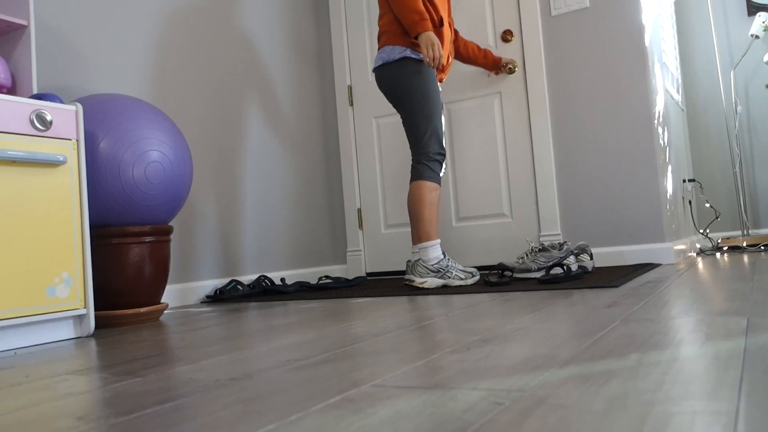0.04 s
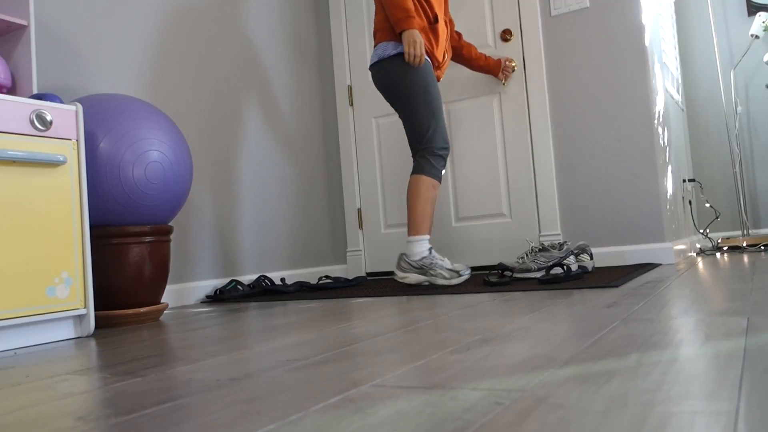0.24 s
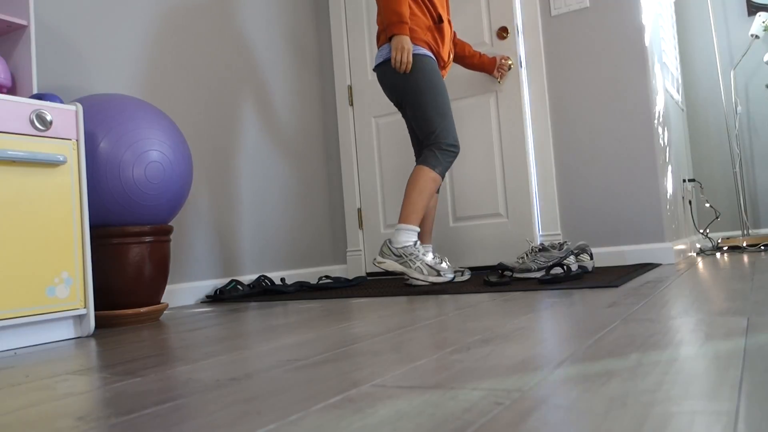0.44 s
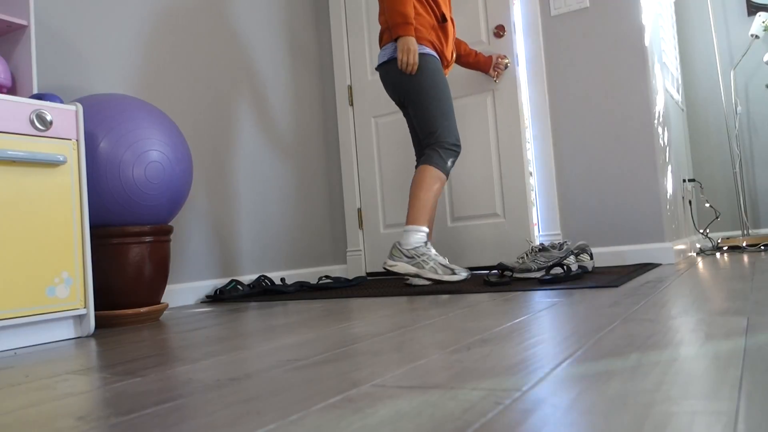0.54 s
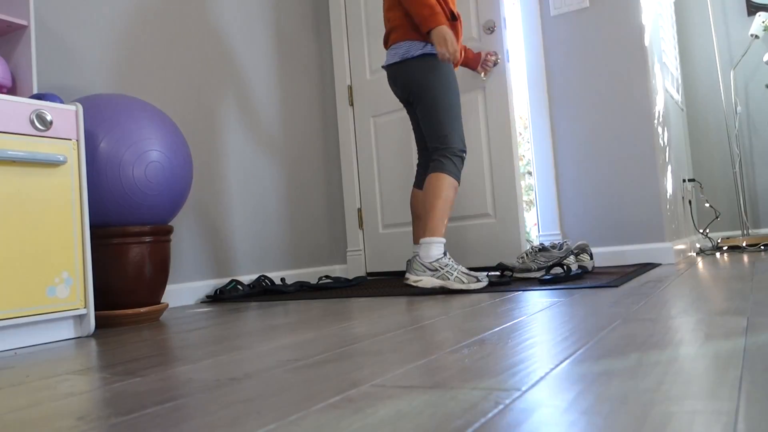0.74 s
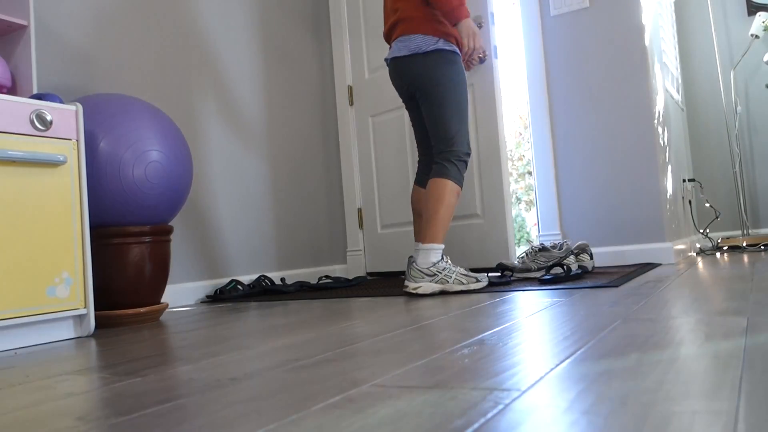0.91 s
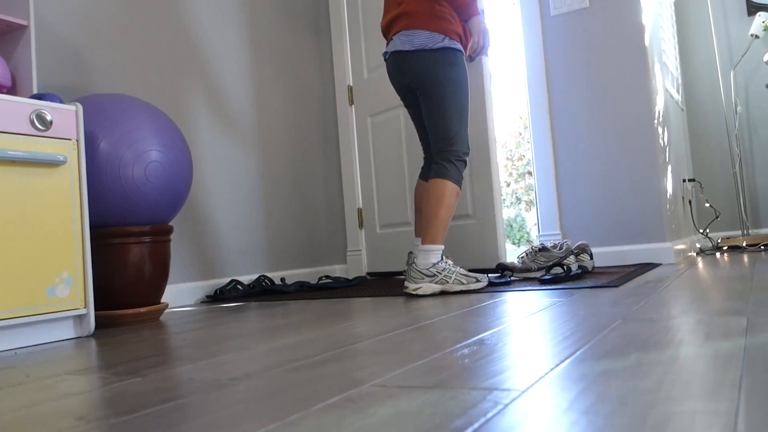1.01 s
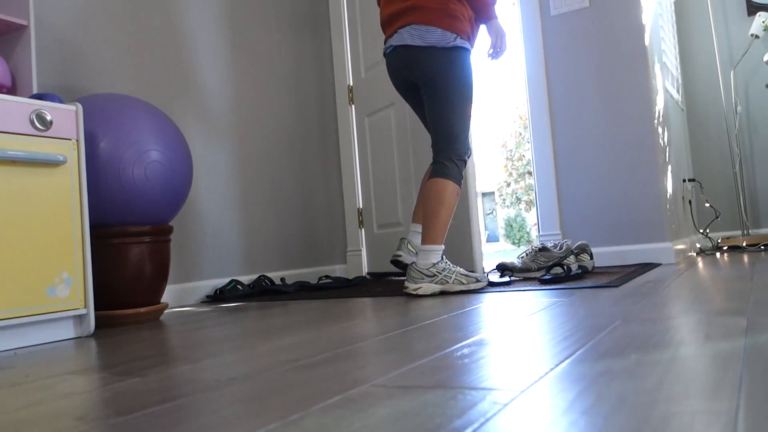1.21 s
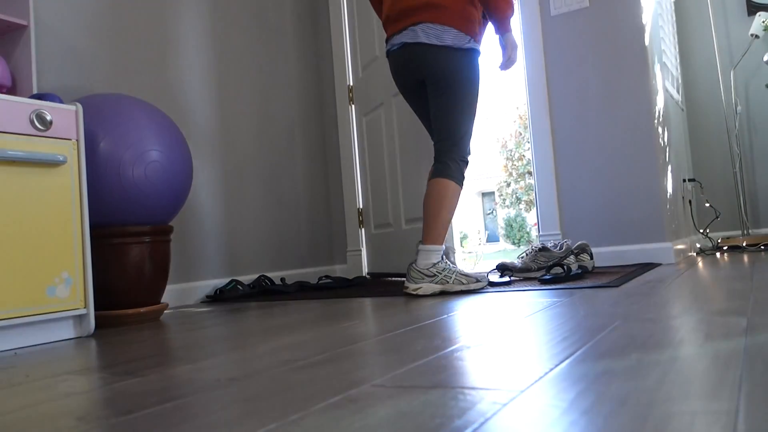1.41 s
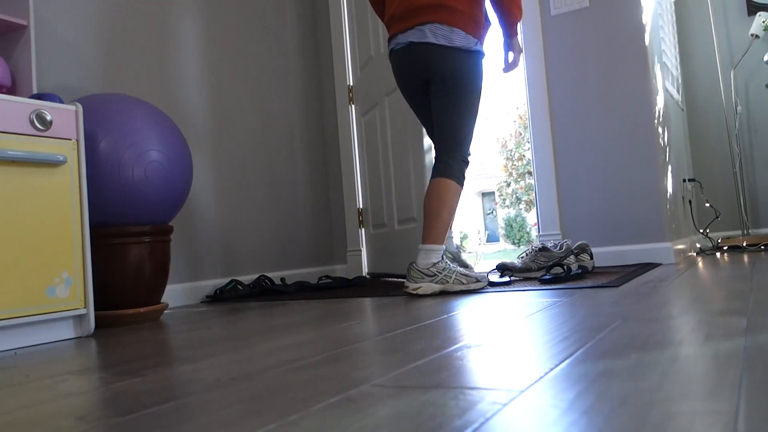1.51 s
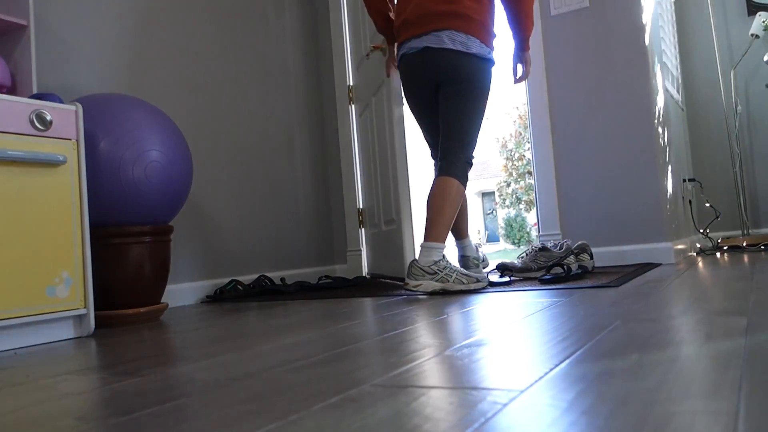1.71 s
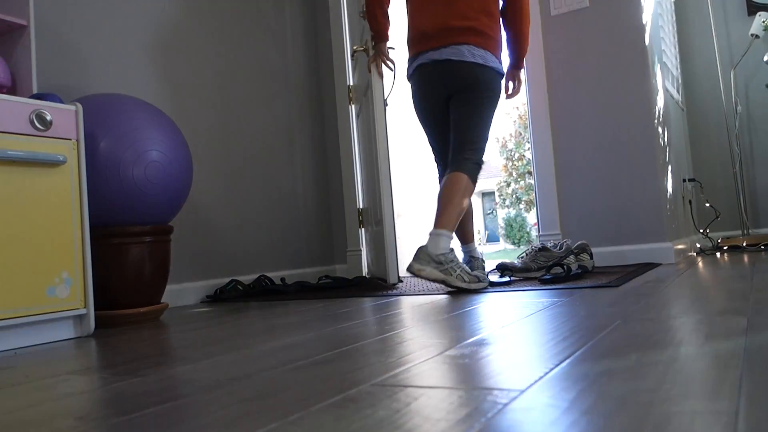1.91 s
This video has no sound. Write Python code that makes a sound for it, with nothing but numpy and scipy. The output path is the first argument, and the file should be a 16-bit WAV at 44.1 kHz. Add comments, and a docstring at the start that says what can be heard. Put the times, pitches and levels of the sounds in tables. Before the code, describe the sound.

A door hinge creaks and squeals as the door opens after a latch click.

```python
"""A front door opens in a hard-floored hall. Clothes rustle, the door knocks, the knob grinds and ticks.
The latch bolt slides on the strike plate and snaps free at 0.3 s. A dry hinge creaks: its stick-slip
speeds up from a rasp to a squeal as the door swings, over the faint groan of a second hinge.
At 1.15 s the bottom seal brushes the sill, catches and flicks free. The squeal ends at 1.5 s;
shoes shuffle and squeak faintly."""
import sys
import numpy as np
from scipy import signal
from scipy.fft import rfft, irfft
from scipy.io import wavfile

SR = 44100
rng = np.random.default_rng(int(sys.argv[2]) if len(sys.argv) > 2 else 0)


def dump(signal):
    """Clip the signal to [-1, 1] and save it as 16-bit WAV at the path in sys.argv[1]."""
    limited = np.clip(np.atleast_2d(signal).T, -1, 1)
    pcm = np.round(limited * 32767).astype(np.int16)
    wavfile.write(sys.argv[1], SR, pcm)


N = 85995
T = np.arange(N) / SR
BINS_HZ = np.fft.rfftfreq(N, 1 / SR)
TOP_HZ, PIVOT_HZ = 15800, 1468  # band limit; reference for rasp tilt and bending delay
# hinge and door leaf response: freq_hz, gain_db
DOOR_COLOUR = [(100, -44), (450, -13.5), (900, -12.5), (1300, -1.5), (2400, 2.5), (3800, 1), (4600, 2.5),
               (5250, 4), (5750, -2.5), (6250, -3), (6800, -1.5), (7400, -7), (8200, -7.5), (9100, -14.5),
               (9800, -8.5), (11000, -13), (16000, -24)]


def undb(db):
    """Decibels to gain."""
    return 10 ** (np.asarray(db) / 20)


def unit(x):
    """Scale to rms 1."""
    return x / np.sqrt(np.mean(x ** 2) + 1e-20)


def at_hz(points, hz):
    """Read (freq_hz, value) points on a log-frequency axis."""
    freqs, values = np.array(points, float).T
    return np.interp(np.log(np.maximum(hz, 1)), np.log(freqs), values)


def curve(rows, column=1):
    """One column of a timed table at every sample."""
    rows = np.array(rows, float)
    return np.interp(T, rows[:, 0], rows[:, column])


def swell(rows, column=1):
    """Gain from a dB column, silent outside the table."""
    return undb(curve(rows, column)) * (T >= rows[0][0]) * (T <= rows[-1][0])


def walk(rate_hz):
    """Smooth random motion, spread near 1."""
    return np.interp(T * rate_hz, np.arange(N // 8), rng.standard_normal(N // 8))


def body(x, colour, size=2048):
    """Ring a minimum-phase, unit-energy filter of the given spectrum."""
    gain = undb(at_hz(colour, np.fft.rfftfreq(size, 1 / SR)))
    cepstrum = irfft(np.log(gain))
    cepstrum[1:size // 2] *= 2
    cepstrum[size // 2 + 1:] = 0
    ring = irfft(np.exp(rfft(cepstrum)))
    return signal.fftconvolve(x, ring / np.linalg.norm(ring))[:N]


def diffuse_spectra(size, coherent_hz=1800):
    """Diffuse noise at two close points: alike in the bass, unrelated in the treble."""
    hz = np.fft.rfftfreq(size, 1 / SR)
    coherence = 1 / (1 + (hz / coherent_hz) ** 2)
    mid, side = rfft(rng.standard_normal((2, size)))
    pair = mid * np.sqrt(1 + coherence) + np.array([[1], [-1]]) * side * np.sqrt(1 - coherence)
    return hz, pair / np.sqrt(2)


def hall(x, wet_db, gap_s=0.00319, size=24000):
    """Direct sound plus a dense stereo tail whose treble dies first."""
    # reverberation: freq_hz, t60_s
    decays = [(150, 0.49), (1000, 0.55), (4000, 0.49), (14000, 0.38)]
    hz, noise = diffuse_spectra(size)
    age_s, tail = T[:size] - gap_s, 0
    for band_hz, t60_s in decays:
        share = at_hz([(f, f == band_hz) for f, _ in decays], hz)
        fade = np.exp(-np.log(1000) * age_s / t60_s) * (age_s > 0)
        tail = tail + irfft(noise * share) * fade / np.linalg.norm(fade)
    wet = signal.fftconvolve(x[None], tail, axes=1)[:, :N]
    return (x + undb(wet_db) * wet) / np.hypot(1, undb(wet_db))


def rub(levels, colour, uneven_db=0, grains_per_s=8300, grain_spread_db=1):
    """Friction: dense tiny catches of random size; uneven_db adds fits and starts."""
    grains = (rng.random(N) < grains_per_s / SR) * rng.standard_normal(N)
    grains *= undb(grain_spread_db * rng.standard_normal(N))
    grains *= undb(uneven_db * walk(120))
    return body(unit(grains) * swell(levels), colour)


def hits(rows, colour):
    """Contacts: decaying noise bursts ring a body."""
    force = sum(undb(level_db) * (T >= start_s) * np.exp(-np.maximum(T - start_s, 0) / decay_s)
                for start_s, level_db, decay_s in rows)
    return body(force * rng.standard_normal(N), colour)


def room_tone(level_db=-63.5):
    """The quiet house and a smooth hiss."""
    # background spectrum: freq_hz, gain_db
    colour = [(30, -35), (110, -13.5), (250, -15), (460, -18), (650, 5.5), (800, -28), (1300, -1),
              (1850, 4), (2600, -4), (4500, -6.5), (15500, -8.5)]
    _, noise = diffuse_spectra(N)
    return unit(np.array([body(side, colour) for side in irfft(noise, N)])) * undb(level_db)


def rustle():
    """Clothes and shoes rub in fits and starts."""
    # friction: time_s, level_db
    levels = [(0, -44.5), (.04, -56.5), (.12, -59.5), (.6, -61), (1.5, -70), (1.72, -72), (1.757, -69),
              (1.8, -73), (1.87, -63.5), (1.95, -80)]
    # rustle spectrum: freq_hz, gain_db
    colour = [(60, -28), (170, -15.5), (270, -3), (420, -10.5), (650, -6), (1000, 0), (2100, -6.5),
              (3500, -9.5), (7000, -20), (16000, -26.5)]
    return rub(levels, colour, uneven_db=5.5)


def knocks():
    """Door and shoes knock on wood."""
    # contacts: start_s, level_db, decay_s
    blows = [(.147, -35.5, 0.0048), (.218, -36, 0.0084), (.319, -36.5, 0.0051), (.758, -30, 0.0056),
             (.971, -37, 0.0048), (1.215, -42, 0.017)]
    # wood response: freq_hz, gain_db
    wood = [(50, -19), (120, -32), (250, -2), (500, -1.5), (1000, 4.5), (2200, -2.5), (4000, -27),
            (7000, -32), (16000, -27)]
    return hits(blows, wood)


def spindle():
    """The knob spindle grinds as it turns."""
    # friction: time_s, level_db
    levels = [(.147, -50), (.19, -36.5), (.23, -40), (.3, -43), (.36, -47.5), (.46, -47.5)]
    # spindle response: freq_hz, gain_db
    colour = [(50, -55.5), (150, -13.5), (400, -22), (700, -4), (950, 2.5), (1800, -6), (3000, -12),
              (4500, -16.5), (7000, -20), (16000, -31)]
    return rub(levels, colour, uneven_db=2.5)


def knob_ticks():
    """The knob and its spring tick crisply."""
    # contacts: start_s, level_db, decay_s
    ticks = [(.1725, -36, 0.00054), (.1792, -28, 0.001), (.1875, -35, 0.0012), (.195, -45, .0015),
             (.2015, -37, 0.0029), (.213, -36.5, 0.0091)]
    # knob response: freq_hz, gain_db
    colour = [(200, -31), (1000, 2), (4000, 14), (6000, -16), (8500, 5.5), (12000, -2.5), (16000, 2)]
    return hits(ticks, colour)


def bolt_slide():
    """The bolt slides on the strike plate."""
    # friction: time_s, level_db
    levels = [(.2, -50), (.245, -37), (.3, -35), (.332, -32.5), (.355, -33.5)]
    # bolt response: freq_hz, gain_db
    colour = [(500, -40), (2500, -11.5), (3400, -7), (3800, -3.5), (4250, 0.5), (4650, -6.5), (5100, -14),
              (6500, -25.5), (16000, -65)]
    return rub(levels, colour)


def bolt_snaps():
    """The bolt jumps off the plate in quick blows and rings briefly."""
    # blows: start_s, peak_db
    snaps = [(.2885, -39), (.2965, -26), (.3398, -19), (.3485, -18.5), (.3512, -19), (.3548, -31)]
    # bolt modes: freq_hz, gain_db, t60_s
    modes = [(3450, -3, 0.014), (3910, -2.5, 0.018), (4010, -1.5, 0.021), (4340, 1.5, 0.0073),
             (4590, -22, .012)]
    start_s, peak_db = np.array(snaps).T
    age_s = np.maximum(T - start_s[:, None], 0)
    ring = 0
    for k, (hz, gain_db, t60_s) in enumerate(modes):
        fade = np.exp(-np.log(1000) * age_s / t60_s)
        ring = ring + (-1) ** k * undb(gain_db) * np.sin(2 * np.pi * hz * age_s) * fade
    return undb(peak_db) @ ring / abs(ring).max()


def hinge(wander=0.005, pivot_delay_s=0.003, pin_db=-6):
    """One unsteady stick-slip rate drives the door's rasp, the pin's ring and the squeal."""
    # slip rate, following door speed: time_s, rate_hz
    rates = [(.355, 247), (.392, 283), (.42, 339.1), (.45, 368.9), (.5, 424), (.55, 478), (.6, 554.5),
             (.62, 642.4), (.642, 775), (.672, 895), (.7, 1011), (.73, 1135), (.77, 1201), (.81, 1219),
             (.86, 1199), (.89, 1136), (.92, 1034), (.955, 905.3), (1.008, 851.3), (1.052, 883.7),
             (1.084, 962.5), (1.148, 1017), (1.178, 1241), (1.226, 1268), (1.31, 1248), (1.41, 1243),
             (1.5, 1224)]
    # uneven slipping as the door speeds up and slows: time_s, spread_ratio
    jitter = [(.36, .008), (.5, .012), (.62, .018), (.7, .012), (.78, .005), (.85, .005), (.92, .022),
              (1.01, .008), (1.08, .022), (1.2, .005)]
    # hinge pin response: freq_hz, gain_db
    pin_colour = [(3000, -55), (5900, -43), (6450, -14.5), (6780, -3.5), (7100, -9), (7600, -24.5),
                  (11000, -51)]
    slip_hz = curve(rates) * (1 + curve(jitter) * walk(250) + wander * walk(70))
    cycles = np.cumsum(slip_hz) / SR
    slips, grit = rasp(slip_hz, cycles)
    # bending waves in the door: lows arrive later
    bending = np.exp(-4j * np.pi * pivot_delay_s * np.sqrt(PIVOT_HZ * BINS_HZ))
    door = body(irfft(rfft(slips + grit) * bending, N), DOOR_COLOUR)
    pin = undb(pin_db) * body(slips, pin_colour)
    return hall(door, wet_db=1.5) + hall(pin, wet_db=-9) + squeal(cycles)


def rasp(slip_hz, cycles, puff_decay_cycles=0.29):
    """One sharp slip and a puff of grit per cycle, softening as the hinge runs freely."""
    # slips from partial 4 up: time_s, level_db, tilt_db_per_octave, grit_db
    shape = [(.354, -36.5, 1.5, -5.5), (.378, -33.5, -0.5, 3), (.42, -32.5, 1, -0.5), (.5, -31.5, -0.5, -8),
             (.6, -36, -1.5, -1.5), (.68, -42.5, -3.5, -1), (.75, -45.5, -4.5, -2), (.82, -48.5, 2.5, -4),
             (.88, -51, -1, 0), (.93, -52, -8.5, -3), (.975, -49.5, -12.5, -0.5), (1.03, -56.5, -18, -21),
             (1.13, -66, -13, -1), (1.17, -72, -6, -9)]
    tilt_db = curve(shape, column=2)
    slips, power = np.zeros(N), np.full(N, 1e-12)
    sounding = (T >= shape[0][0]) & (T <= shape[-1][0])
    for k in range(4, int(TOP_HZ / slip_hz.min())):
        on = sounding & (k * slip_hz < TOP_HZ)
        partial_hz = k * slip_hz[on]
        gain = undb(tilt_db[on] * np.log2(np.maximum(partial_hz / PIVOT_HZ, 1)))
        slips[on] += gain * np.cos(2 * np.pi * k * cycles[on])
        power[on] += (gain * undb(at_hz(DOOR_COLOUR, partial_hz))) ** 2 / 2
    puffs = rfft(rng.standard_normal(N) * unit(np.exp(-(cycles % 1) / puff_decay_cycles)))
    octaves = np.log2(np.maximum(BINS_HZ / PIVOT_HZ, 1))
    grit = sum(irfft(puffs * np.maximum(1 - abs(octaves - k), 0), N) * undb(tilt_db * k)
               for k in range(5))
    grit *= np.sqrt(SR / slip_hz) / 2 * undb(curve(shape, column=3))
    # slips reach level_db after the door's filter
    door_power = np.mean(undb(at_hz(DOOR_COLOUR, BINS_HZ)) ** 2)
    force = np.sqrt(door_power / power) * swell(shape)
    return force * slips, force * grit


def squeal(cycles, flutter_db=4):
    """The three lowest slip partials sing, each fluttering on its own."""
    # partial levels: time_s, first_db, second_db, third_db
    levels = [(.36, -71, -64, -64), (.44, -57.5, -51.5, -52), (.52, -61, -43.5, -45),
              (.6, -49.5, -44.5, -42.5), (.645, -48, -44.5, -39.5), (.672, -35, -36.5, -45),
              (.695, -44.5, -42, -46), (.735, -38.5, -39.5, -46), (.77, -48.5, -35, -40),
              (.81, -39.5, -48.5, -42), (.86, -51.5, -38, -42.5), (.888, -31.5, -34, -47.5),
              (.925, -41, -41, -43), (.965, -33, -33.5, -42), (1.008, -41, -40, -54),
              (1.04, -36.5, -60, -42), (1.07, -40.5, -34.5, -47), (1.1, -43.5, -50, -59.5),
              (1.14, -40, -58, -60), (1.172, -68, -56, -70), (1.23, -49, -42, -46.5),
              (1.275, -47.5, -63, -67), (1.305, -55, -41.5, -68), (1.385, -53, -67, -76),
              (1.41, -72, -57, -77), (1.44, -72, -62, -80), (1.475, -52, -66, -91), (1.5, -53.5, -71, -74),
              (1.508, -81, -76, -88)]
    # reverberation per partial: wet_db
    sends = [-4, 1, 1]
    out = 0
    for k, wet_db in enumerate(sends, 1):
        gain = np.sqrt(2) * swell(levels, column=k) * undb(flutter_db * walk(130))
        partial = gain * np.sin(2 * np.pi * k * cycles)
        out = out + hall(partial + hall_ring(partial), wet_db)
    return out


def hall_ring(drive):
    """The hall rings on where the squeal sweeps past its resonances."""
    # hall resonances: freq_hz, gain_db, t60_s
    resonances = [(1193, -8, 0.49), (2390, -5, 0.52), (2430, 4, .35), (3360, -2, 0.37), (3540, -4, .35)]
    ring = 0
    for hz, gain_db, t60_s in resonances:
        decay_per_s = np.log(1000) / t60_s
        gain = undb(gain_db) * 2 * decay_per_s / SR
        ring = ring + gain * np.exp(-decay_per_s * T) * np.cos(2 * np.pi * hz * T)
    return signal.fftconvolve(drive, ring)[:N]


def groan(wander=0.013):
    """A second hinge sounds a faint low tone and its octave."""
    # tone: time_s, pitch_hz, level_db, octave_level_db
    tone = [(.46, 205.3, -76, -89), (.54, 210.3, -60.5, -83), (.66, 207.9, -90, -95),
            (.73, 281.8, -56.5, -60), (.79, 338, -52.5, -67), (.85, 361.7, -46.5, -66),
            (.91, 351.4, -55.5, -65), (.95, 291.8, -58, -69), (1.02, 289.2, -53.5, -78),
            (1.105, 291.5, -58, -52.5), (1.135, 288, -72, -66)]
    pitch_hz = curve(tone) * (1 + wander * walk(77.8))
    phase = 2 * np.pi * np.cumsum(pitch_hz) / SR
    return np.sqrt(2) * (swell(tone, 2) * np.sin(phase) + swell(tone, 3) * np.sin(2 * phase))


def seal_brush():
    """The door's bottom seal brushes the sill."""
    # friction: time_s, level_db
    levels = [(1.14, -62), (1.165, -40), (1.245, -44), (1.29, -49.5), (1.35, -61.5), (1.44, -82)]
    # brushing spectrum: freq_hz, gain_db
    colour = [(60, -47), (140, -23), (220, -5.5), (350, -2), (500, -5), (1100, 10), (2000, 3), (4200, -7),
              (6200, -15), (6950, -20), (7350, -10), (7800, -21.5), (16000, -25)]
    return rub(levels, colour)


def seal_flicks():
    """The seal catches on the sill and flicks free."""
    # releases: start_s, level_db, decay_s
    flicks = [(1.148, -41, 0.0046), (1.153, -37, 0.014), (1.18, -43, 0.028)]
    # flick spectrum: freq_hz, gain_db
    colour = [(200, -28), (1000, 4), (2500, 8.5), (4000, 10.5), (6000, -0.5), (8500, -1), (12000, -7.5),
              (16000, -5.5)]
    return hits(flicks, colour)


def shoe_squeaks(roughness=0.086, sag_hz_per_s=7600):
    """Short, rough, falling chirps of a rubber sole."""
    # squeaks: start_s, length_s, pitch_hz, level_db
    squeaks = [(1.732, 0.037, 2266, -65), (1.87, 0.017, 1630, -66), (1.891, 0.029, 2126, -66)]
    out = 0
    for start_s, length_s, pitch_hz, level_db in squeaks:
        age_s = T - start_s
        hz = (pitch_hz - sag_hz_per_s * age_s) * (1 + roughness * walk(700))
        arch = 2 * np.sin(np.pi * np.clip(age_s / length_s, 0, 1))
        out = out + undb(level_db) * arch * np.sin(2 * np.pi * np.cumsum(hz) / SR)
    return out


def scene():
    """All sources in the hall, treble leaning right, over the room tone."""
    # stereo balance: freq_hz, left_minus_right_db
    balance = [(150, -0.5), (700, 1), (1400, 1), (2800, -1.5), (5500, -4), (14000, -2.5)]
    handling = rustle() + knocks() + spindle() + seal_brush() + shoe_squeaks()
    catches = bolt_slide() + bolt_snaps() + seal_flicks()
    mix = hall(handling, wet_db=0.5) + hall(knob_ticks(), wet_db=-2) + hall(catches, wet_db=-3)
    mix += hinge() + hall(groan(), wet_db=-4)
    lean_db = at_hz(balance, BINS_HZ) * np.array([[1], [-1]]) / 2
    return irfft(rfft(mix) * undb(lean_db), N) + room_tone()


def record(dry):
    """Steep low-pass at TOP_HZ."""
    return signal.sosfilt(signal.ellip(10, .2, 70, TOP_HZ, fs=SR, output="sos"), dry)


dry = scene()
out = record(dry)
dump(out)
```